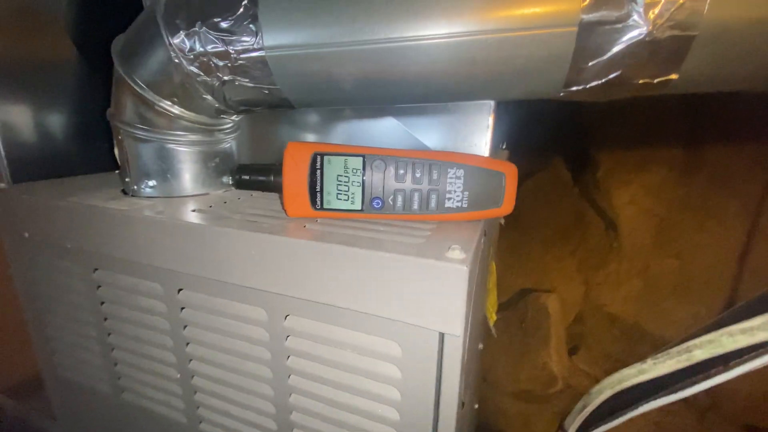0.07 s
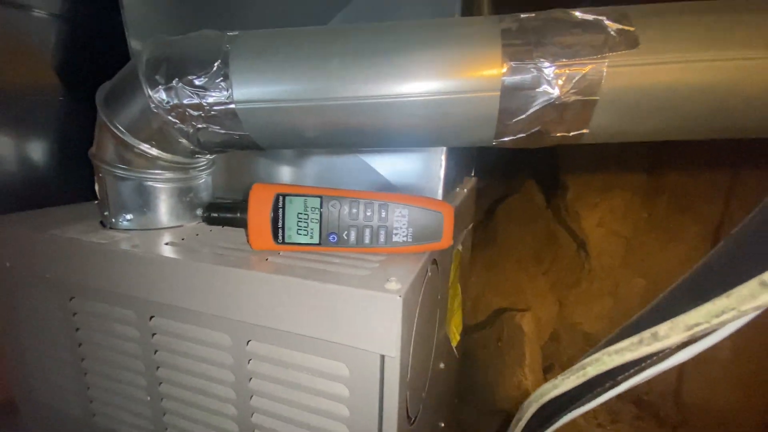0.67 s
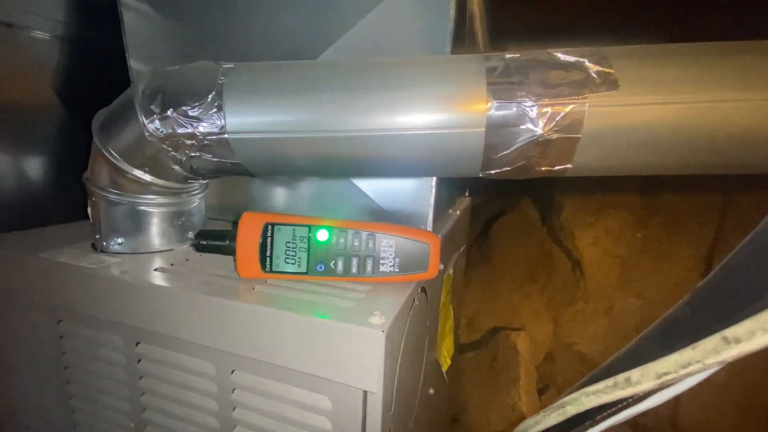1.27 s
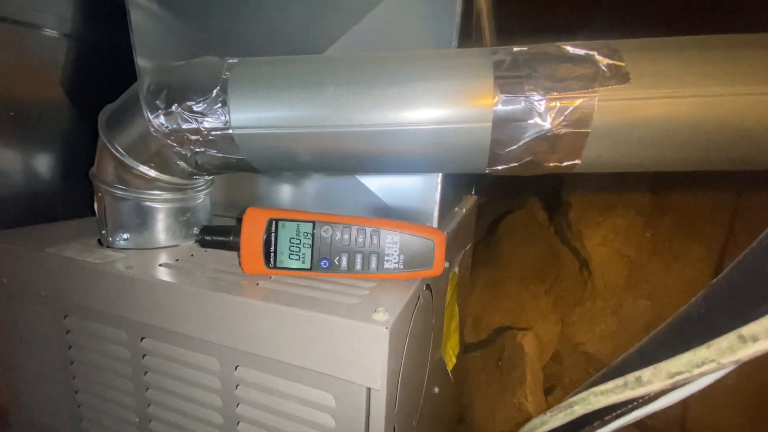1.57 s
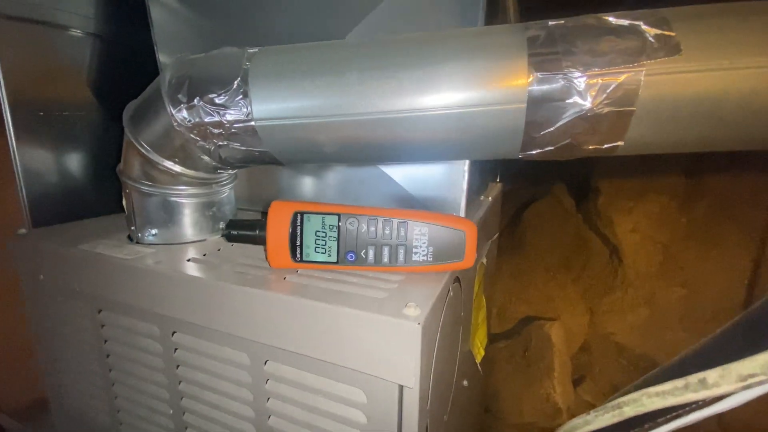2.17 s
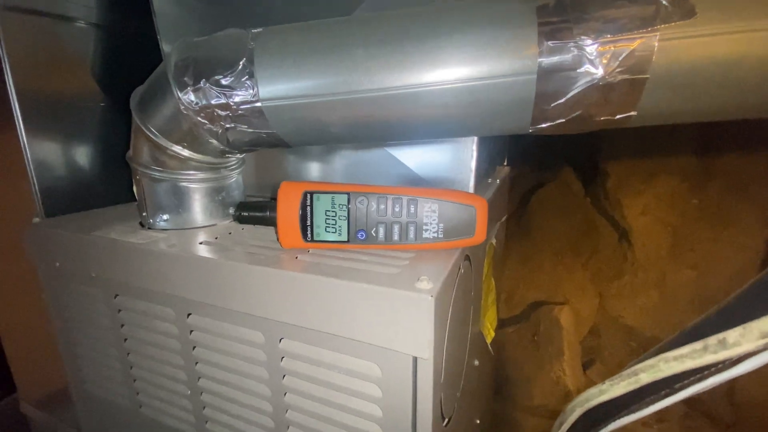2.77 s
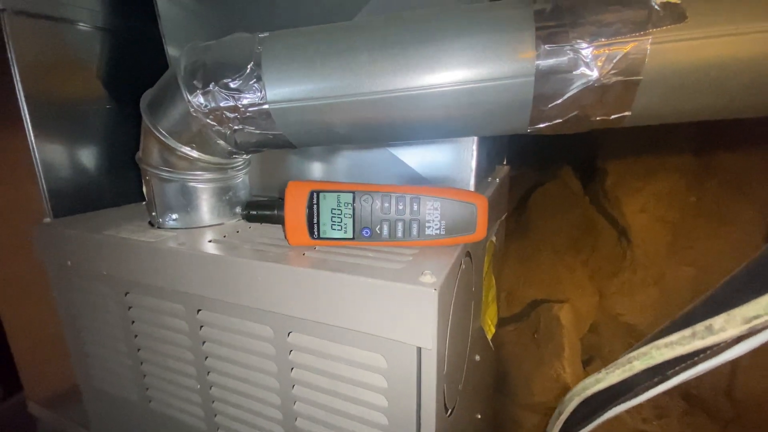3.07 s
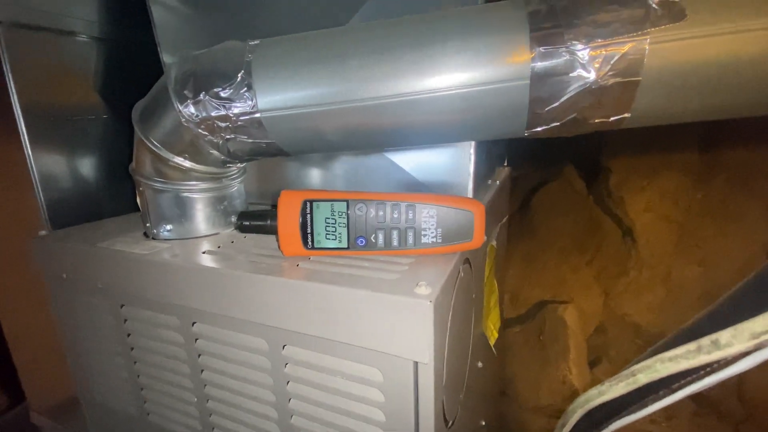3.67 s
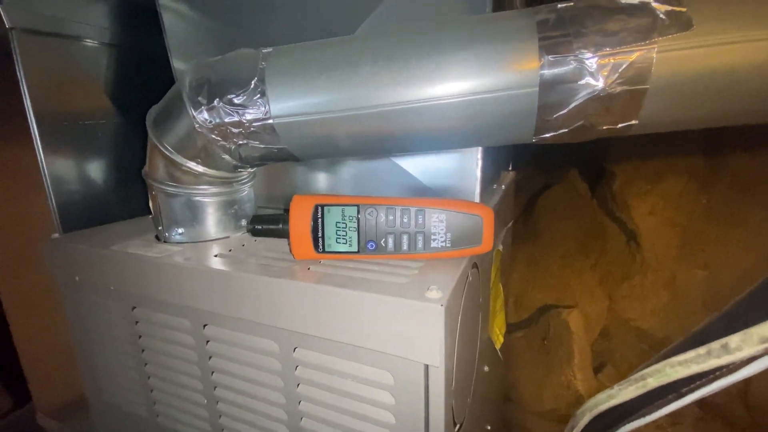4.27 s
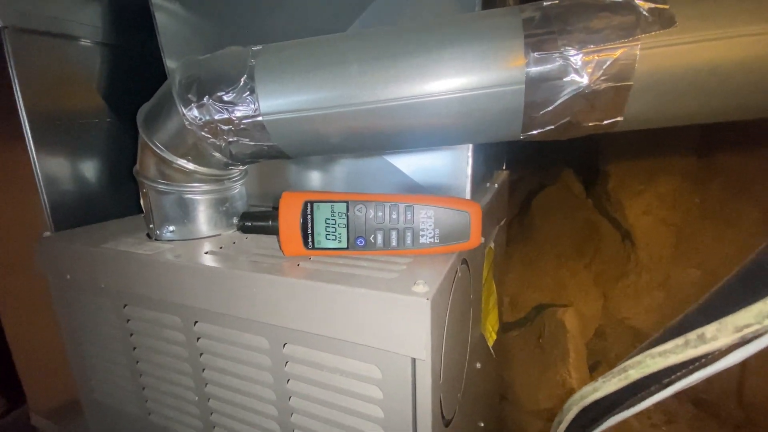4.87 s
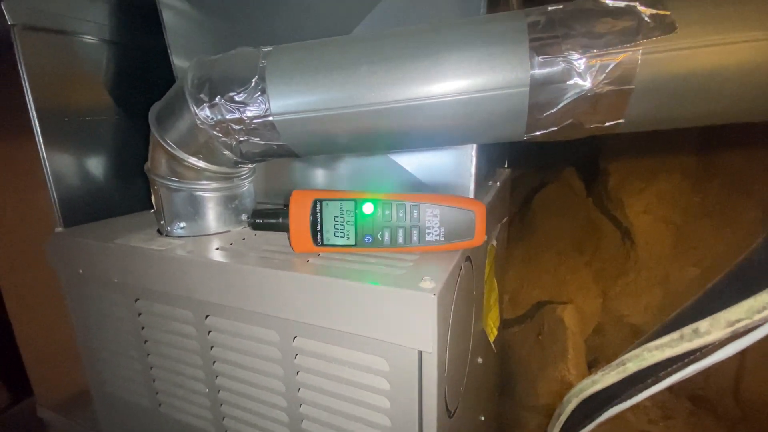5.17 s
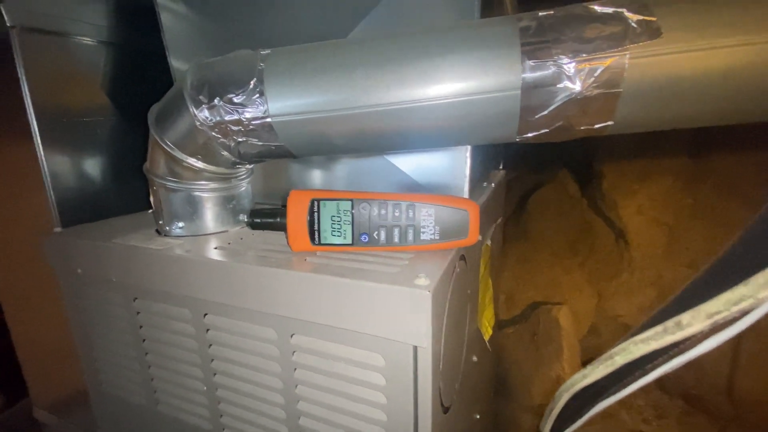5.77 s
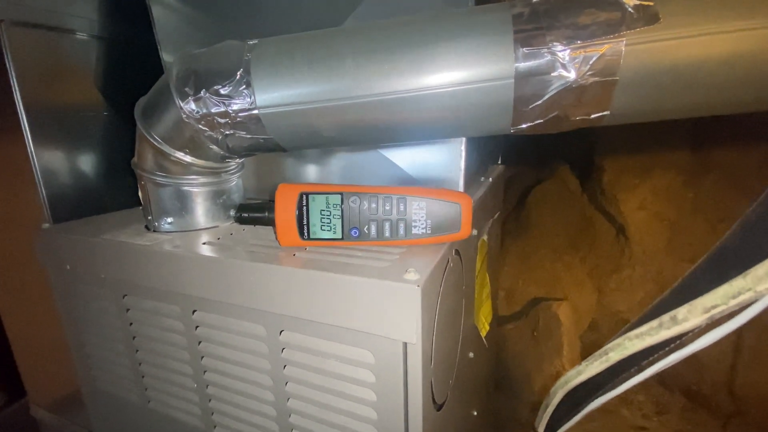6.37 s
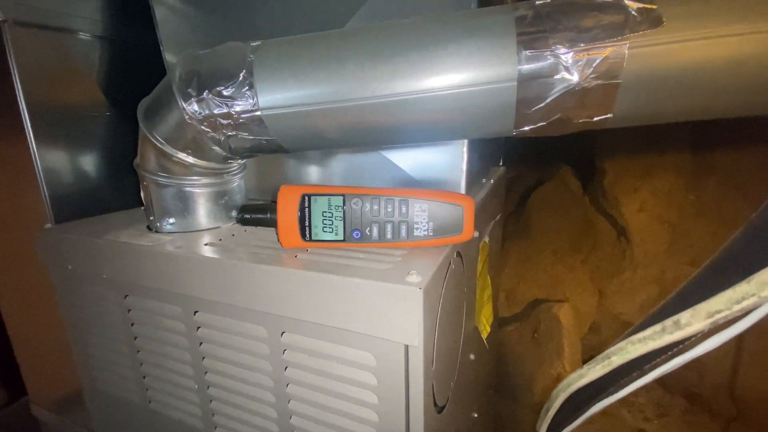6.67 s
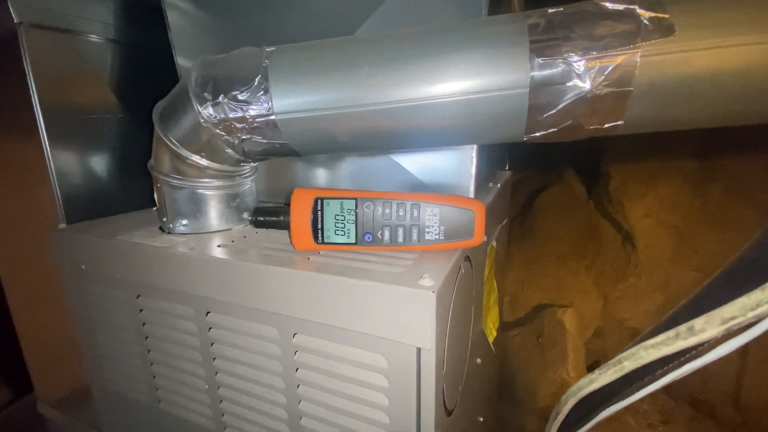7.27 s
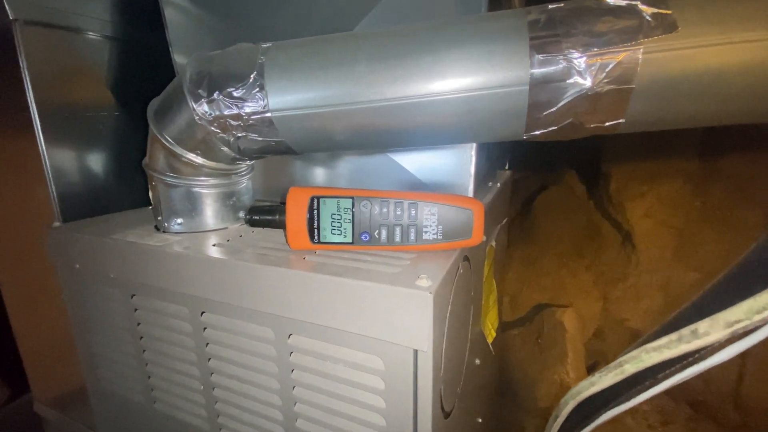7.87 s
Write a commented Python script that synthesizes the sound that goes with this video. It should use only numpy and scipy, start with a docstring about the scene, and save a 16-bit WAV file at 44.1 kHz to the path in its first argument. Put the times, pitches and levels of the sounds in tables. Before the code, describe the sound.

Close to the microphone and slightly left, furnace burners rumble deeply in a basement, with air rushing through sheet metal and a few faint whistles. After a couple of seconds the airflow grows and a low, pulsing hum of two tones joins the rumble, staying to the end. Small dry ticks are scattered all the way through, and a soft high rustle is heard once.

```python
"""A basement, with a gas furnace running close by and a little to the left.
The burners rumble in the flue and air rushes through the sheet-metal cabinet and ducts. Around 2.6 s
the rush swells and two resonances of the furnace set in as a throbbing two-note hum.
Dry ticks crackle all the way through, faint whistles come and go, and there is one brief high rustle."""
import sys
import numpy as np
from scipy import signal
from scipy.fft import rfft, irfft
from scipy.io import wavfile
from scipy.ndimage import uniform_filter1d

SR = 44100
rng = np.random.default_rng(int(sys.argv[2]) if len(sys.argv) > 2 else 0)


def master_out(mix):
    """Clip the mix to full scale and print it as 16-bit PCM to the path in sys.argv[1]."""
    frames = np.transpose(np.atleast_2d(mix))
    ceiling = np.clip(frames, -1, 1)
    pcm = np.round(ceiling * 32767).astype(np.int16)
    wavfile.write(sys.argv[1], SR, pcm)


N = 353373
TIME = np.arange(N) / SR
FREQS = np.maximum(np.arange(N // 2 + 1) * SR / N, 1)
SWELL_S, SWELL_LENGTH_S = 2.59, 0.21   # the air flow grows as the hum sets in


def from_db(db):
    """Decibels to gain."""
    return 10 ** (np.asarray(db) / 20)


def power_db(power):
    """Power to decibels."""
    return 10 * np.log10(power)


def unit_rms(x):
    """Scale to an rms of 1."""
    return x / np.sqrt(np.mean(x ** 2) + 1e-20)


def ramp(start_s, length_s):
    """A straight fade from 0 to 1."""
    return np.clip((TIME - start_s) / length_s, 0, 1)


def over_time(rows):
    """An envelope's breakpoints joined up at every sample."""
    return np.interp(TIME, *np.transpose(rows))


def over_frequency(rows):
    """Each column of a spectrum at every frequency, joined on a log axis."""
    hz, *columns = np.transpose(rows)
    return [np.interp(np.log(FREQS), np.log(hz), column) for column in columns]


def bell(hz, width_hz):
    """Power response of a resonance applied twice, 1 at its peak."""
    return 1 / (1 + (2 * (FREQS - hz) / width_hz) ** 2) ** 2


def drift(rate_hz):
    """A smooth random wander with an rms of about 1."""
    hop, run_in = 40, 2000
    pole = np.exp(-2 * np.pi * rate_hz * hop / SR)
    noise = rng.standard_normal(N // hop + run_in + 2)
    slow = signal.lfilter([1], [1, -2 * pole, pole * pole], noise)[run_in:]
    return np.interp(np.arange(N) / hop, np.arange(len(slow)), unit_rms(slow))


def turbulence(density_db):
    """Stereo noise of the given dB per Hz, with its own left-right likeness, phase and balance per band."""
    # stereo spread of the noise: freq_hz, coherence (0-1), left_lead_rad, left_over_right_db
    stereo_spread = [(25, 0.7, 0.5, 5.5), (50, 0.95, 0.6, 3.7), (75, 0.95, 0.8, 5.0),
                     (110, 0.99, 0.75, 6.7), (150, 0.99, 1.15, 8.8), (190, 0.8, 1.1, 8.5),
                     (255, 0.92, 1.6, 10.3), (300, 0.76, 1.2, 10.0), (355, 0.5, 1.4, 11.0),
                     (405, 0.15, 3.0, 5.2), (440, 0.3, 4.6, 10.5), (490, 0.15, 3.5, 8.0),
                     (560, 0.45, 4.6, 7.2), (650, 0.72, 5.1, 4.6), (710, 0.35, 4.8, 5.5),
                     (780, 0.72, 4.4, 6.0), (890, 0.68, 4.4, 1.0), (980, 0.62, 4.7, 2.7),
                     (1250, 0.7, 5.0, 2.8), (1450, 0.55, 5.3, 4.7), (1650, 0.15, 5.7, 5.5),
                     (1900, 0.68, 5.4, 7.0), (2150, 0.48, 6.1, 1.8), (2550, 0.22, 5.3, 2.2),
                     (3400, 0.15, 4.3, -1.7), (4500, 0.25, 6.0, 0.0), (6100, 0.3, 3.0, -3.2),
                     (7800, 0.4, -0.3, 1.2), (8800, 0.75, 3.1, 0.3), (9700, 0.41, 4.2, 0.3),
                     (11000, 0.93, 6.3, 0.3), (12000, 0.8, 6.3, 0.2), (13300, 0.55, 9.4, 0.2),
                     (15400, 0.8, 12.5, 0.8)]
    coherence, lead_rad, pan_db = over_frequency(stereo_spread)
    shared, own = rfft(rng.standard_normal((2, N)))
    left = shared * from_db(pan_db / 2)
    right = coherence * shared + np.sqrt(1 - coherence ** 2) * own
    right = right * np.exp(-1j * lead_rad) * from_db(-pan_db / 2)
    equal_power = np.sqrt(2 / (from_db(pan_db) + from_db(-pan_db)))
    return irfft(np.array([left, right]) * equal_power * from_db(density_db) * np.sqrt(SR / 2), N)


def resonant_flow(before_db, after_db, bands, start_s, length_s):
    """Turbulence shaped by peaks and dips, crossfading from one colour to another."""
    for hz, width_hz, lift_before_db, lift_after_db in bands:
        shape = bell(hz, width_hz)
        before_db = before_db + power_db(1 + (from_db(2 * lift_before_db) - 1) * shape)
        after_db = after_db + power_db(1 + (from_db(2 * lift_after_db) - 1) * shape)
    blend = ramp(start_s, length_s)
    return np.sqrt(1 - blend) * turbulence(before_db) + np.sqrt(blend) * turbulence(after_db)


def ride_level(noise, level_db, window_s):
    """Even out a noise over window_s, then set it to a level."""
    power = uniform_filter1d(noise.mean(axis=0) ** 2, int(window_s * SR))
    return noise / np.sqrt(power + 1e-20) * from_db(level_db)


def whistles(whine_hz=670, whine_db=-58, beat_s=0.638, crest_s=4.37, wander_hz=2.05, pan_db=5):
    """Thin tones in the rush: a whine beats slowly, a few join the hum, two whistles come and go."""
    # faint steady tones that enter with the hum: pitch_hz, level_db
    held_tones = [(705, -61), (775.5, -61), (1009, -67), (2017, -64)]
    # whistles that swell and fade: middle_s, length_s, pitch_hz, level_db
    passing_tones = [(.4, 1.7, 1191, -53.5), (0.918, 0.63, 888, -50.5)]
    tones = [(whine_hz, from_db(whine_db) * np.cos(np.pi * (TIME - crest_s) / beat_s))]
    tones += [(hz, from_db(db) * ramp(SWELL_S, SWELL_LENGTH_S)) for hz, db in held_tones]
    for middle_s, length_s, hz, db in passing_tones:
        arch = np.cos(np.pi * np.clip((TIME - middle_s) / length_s, -0.5, 0.5))
        tones.append((hz, from_db(db) * arch))
    wave = np.zeros(N)
    for hz, gain in tones:
        pitch_hz = hz + wander_hz * drift(rate_hz=4)
        wave += gain * np.sin(2 * np.pi * np.cumsum(pitch_hz) / SR)
    return np.sqrt(2) * wave * from_db([[pan_db / 2], [-pan_db / 2]])


def rustle(peak_s=5.112, peak_db=-49.5, grain_db=4.5, crinkle_s=5.138, crinkle_db=-40.5):
    """A faint, brief high rustle in uneven grains, with one small crinkle in its lower band."""
    # treble bands of the rustle: centre_hz, width_hz, relative_db
    rustle_bands = [(4600, 1700, -1), (6600, 1300, 2)]
    bands = [from_db(2 * db) * bell(hz, width_hz) for hz, width_hz, db in rustle_bands]
    since_s = TIME - peak_s
    level_db = peak_db + np.minimum(170 * since_s, -150 * since_s)   # rise and fall in dB per second
    stir = unit_rms(turbulence(power_db(sum(bands)))) * from_db(level_db + grain_db * drift(rate_hz=90))
    snap = from_db(crinkle_db) * np.exp(-((TIME - crinkle_s) / 0.0024) ** 2)
    return stir + unit_rms(turbulence(power_db(bands[0]))) * snap


def small_ticks(beat_hz=83.004, cycle_hz=21.688, cycle_at_s=0.0164, window_s=0.004):
    """Rows of quiet ticks: each fast beat may tick, most likely near a beat of the slower cycle."""
    start_s = np.arange(1, int(N / SR * beat_hz)) / beat_hz
    apart_s = (((start_s - cycle_at_s) * cycle_hz + 0.5) % 1 - 0.5) / cycle_hz
    chance = 0.1 + 0.8 * np.exp(-(apart_s / window_s) ** 2)
    fires = rng.random(len(start_s)) < chance
    size, side = np.clip(rng.standard_normal((2, len(start_s))), -2, 1)
    level_db, pan_db, knock_db = -35 + 1.5 * size, 10 + 6 * side, np.zeros(len(start_s))
    return np.column_stack([start_s, level_db, pan_db, knock_db])[fires]


def ticks(boost_db=6.0, edge_hz=15000, knock_hz=600, decay_s=0.0015):
    """Dry clicks, mostly on the left: each a sudden step in the waveform, up or down, that dies fast."""
    # the loudest ticks: start_s, level_db (before the boost), left_over_right_db, knock_lift_db
    loud_ticks = [(0.4363, -24, 16, 2.5), (0.5176, -27.0, 16, -3), (0.5301, -26, 10, 0),
                  (0.6139, -26.5, 16, 2), (0.6621, -23, 15, 0.5), (0.795, -29.5, 16, -8),
                  (1.0359, -28, 11, 2), (1.1207, -32, 16, 2), (1.217, -28.5, 18, 5), (1.349, -28, -3, -3),
                  (1.3541, -30.0, 16, 5), (1.7597, -18.5, 12, 0), (1.867, -31, 12, 2),
                  (1.9029, -20.5, 16, 0.5), (2.0484, -19.5, 6, -3), (2.2286, -29.5, 10, 1),
                  (2.3199, -30, 14, 3), (2.3249, -29.5, 1, 1), (2.5542, -24.5, 13, 2),
                  (2.7342, -24.5, 16, 2.5), (2.9752, -24.5, 12, 1), (3.1082, -25.5, 12, 3.5),
                  (3.2413, -31, 16, 6), (3.4213, -20.5, 3, -2), (3.4338, -22, 5, -4), (3.5658, -28, 16, -1),
                  (3.6987, -25, 16, -1), (3.795, -28, 16, 1), (3.8034, -28, 7, 1), (3.8432, -21.5, 18, 1),
                  (3.9752, -26.5, 0, -2), (4.0725, -22, 14, -2), (4.2527, -29, 9, 6), (4.349, -24, 16, 1),
                  (4.3972, -28, 16, 4), (4.5301, -29.0, 13, 5), (4.5417, -27.5, 7, 0),
                  (4.7709, -25, 16, -1), (4.8066, -24, 2, 4), (4.812, -25, 14, 0), (5.0841, -23.5, 5, 0),
                  (5.1805, -26.5, 5, -8), (5.2188, -26, 16, 0), (5.4936, -25, 9, 2), (5.5061, -29, -7, -3),
                  (5.7824, -27, 16, -2), (6.0118, -27, 13, 2), (6.06, -21.5, 6, -1), (6.2893, -24.5, 8, -5),
                  (6.3374, -29, 14, 4), (6.4695, -22, 16, 0), (6.5658, -28, 16, -1), (6.8789, -25, 7, 1),
                  (6.891, -23, 0, -1), (6.9752, -26, 5, 0), (7.121, -24, 16, 0), (7.1688, -27, 9, 1),
                  (7.3009, -27, 16, 1), (7.349, -28, 12, -2), (7.4334, -25, -4, 3), (7.8548, -28, 15.5, 3)]
    start_s, level_db, pan_db, knock_db = np.vstack([small_ticks(), loud_ticks]).T
    sides = from_db([pan_db / 2, -pan_db / 2])
    at = np.clip(np.round(start_s * SR).astype(int), 0, N - 1)
    polarity = rng.choice([-1, 1], len(at))
    clicks, knocks = np.zeros((2, 2, N))
    clicks[:, at] = sides / sides.mean(axis=0) * from_db(level_db + boost_db) * polarity
    knocks[:, at] = clicks[:, at] * (from_db(knock_db) - 1)   # more or less of a dull knock
    knock_band = signal.butter(1, [knock_hz / 2, knock_hz * 2], "band", fs=SR)
    clicks = clicks + signal.lfilter(*knock_band, knocks + 1e-18)
    soften = np.exp(-2 * np.pi * edge_hz / SR)   # slightly rounds the attack
    clicks = signal.lfilter([1 - soften], [1, -soften], clicks + 1e-18)
    leak = np.exp(-1 / (decay_s * SR))   # each click becomes a step that dies away
    return signal.lfilter([1], [1, -leak], clicks)


def air_rush(after_trim_db=-0.74, surge_db=0.5, settle_s=1, flutter_db=0.9):
    """Air flutters through the ringing ducts and surges as the hum starts; its hiss swells twice."""
    # colour of the rush around the swell: freq_hz, before_db_per_hz, after_db_per_hz (untrimmed)
    rush_spectrum = [(316, -67, -61), (419, -69, -63.5), (530, -74, -67), (780, -73.5, -69),
                     (1000, -75, -71.5), (1380, -74.5, -72), (1630, -79, -76.5), (2170, -77, -75.5),
                     (3190, -84, -81), (4980, -89, -85.5), (6500, -90, -87), (9200, -99, -96.5),
                     (15300, -106.9, -102.4)]
    # peaks and dips in the colour of the rush: centre_hz, width_hz, lift_before_db, lift_after_db
    rush_bands = [(254, 109, 13, 10), (308.6, 80, -12, -4), (382, 47, 0, -2), (441, 22, 5, 5.5),
                  (560, 17, 9.5, 4.5), (645, 44, 9, -1.5), (668, 35, 2.5, 5), (886, 60, 8, 6.5),
                  (1180, 40, 2, 3), (1310, 31, 6, 6), (1370, 40, 2.5, 3), (1903, 110, 6.5, 6),
                  (2027, 67, -3, 4), (2640, 77, 4.5, 4.5), (3150, 51, 4, 4), (7030, 3140, 4, 3.5),
                  (10680, 2500, 6.5, 7.5)]
    # envelope of a broad band of hiss: time_s, level_db_per_hz
    hiss_envelope = [(0, -100), (0.25, -87), (0.55, -78.5), (1.1, -79.5), (1.5, -83.5), (2.62, -85),
                     (2.75, -76), (3.05, -77), (3.3, -84), (3.9, -88), (8, -92)]
    settling_s = np.maximum(TIME - SWELL_S - SWELL_LENGTH_S, 0)
    overshoot_db = surge_db * ramp(SWELL_S, SWELL_LENGTH_S) * np.exp(-settling_s / settle_s)
    gain = from_db(overshoot_db + flutter_db * drift(rate_hz=20))
    hiss = turbulence(power_db(bell(hz=2200, width_hz=890))) * from_db(over_time(hiss_envelope))
    before_db, after_db = over_frequency(rush_spectrum)
    rush = resonant_flow(before_db, after_db + after_trim_db, rush_bands, SWELL_S, SWELL_LENGTH_S)
    return rush * gain + hiss


def hum_note(hz, sag_hz_per_s, overtones, start_s, attack_s, level_db, db_per_s, waver_db,
             sway_rad, pan_db, left_lead_rad, throb_hz=7.2, throb_db=0.1):
    """One slowly sagging note; the throb sways its phase and, very slightly, its wavering level."""
    since_s = TIME - start_s
    pitch_hz = hz - sag_hz_per_s * since_s
    throb = np.sin(2 * np.pi * throb_hz * TIME + 0.1 * drift(rate_hz=0.75))
    phase = 2 * np.pi * np.cumsum(pitch_hz) / SR + sway_rad * (throb + 0.13 * drift(rate_hz=21))
    phase = phase - np.array([[0], [left_lead_rad]])
    wave = np.sin(phase) + sum(from_db(db) * np.sin(round(k) * phase) for k, db in overtones)
    right = from_db(-pan_db)
    centre = abs(1 + right * np.exp(-1j * left_lead_rad)) / 2   # panning keeps the mono level
    sides = np.array([[1], [right]]) / centre
    attack = np.clip(since_s / attack_s, 1e-4, 1)
    envelope_db = level_db + db_per_s * since_s + throb_db * throb + waver_db * drift(rate_hz=9.9)
    return np.sqrt(2) * wave * sides * attack * from_db(envelope_db)


def hum():
    """Two resonances of the furnace sing about a minor third apart, the upper one less steadily."""
    # overtones of each note: harmonic_number, relative_db
    low_overtones = [(2, -30)]
    high_overtones = [(3, -32)]
    low = hum_note(hz=220, sag_hz_per_s=0.14, overtones=low_overtones,
                   start_s=2.705, attack_s=0.05, level_db=-24.5, db_per_s=-1.02, waver_db=0.63,
                   sway_rad=0.036, pan_db=13.6, left_lead_rad=1.09)
    high = hum_note(hz=259.5, sag_hz_per_s=0.53, overtones=high_overtones,
                    start_s=2.42, attack_s=0.3, level_db=-31.5, db_per_s=0.43, waver_db=0.65,
                    sway_rad=0.7, pan_db=10.5, left_lead_rad=1.7)
    return low + high


def burners(roar_trim_db=0.1, draught_db=-32, crossover_hz=85, rolloff_hz=172):
    """The flames roar unevenly in the flue, which passes only bass, over a deep, steady draught."""
    # strength of the flames' roar: time_s, level_db (untrimmed)
    flame_envelope = [(0.0, -21.5), (0.38, -25), (0.64, -19), (0.84, -29.5), (0.89, -25), (1.45, -24),
                      (1.54, -29.5), (1.56, -19.5), (1.69, -29), (1.74, -18), (1.78, -32), (1.83, -22.5),
                      (2.25, -21), (2.34, -32), (2.36, -20.5), (2.67, -23.5), (2.72, -18), (2.74, -21),
                      (2.99, -26), (3.03, -19), (3.12, -25), (4.21, -22.5), (4.3, -31), (4.34, -22.5),
                      (4.63, -27), (4.79, -16.5), (4.86, -33), (4.88, -25), (5.35, -24), (5.39, -29),
                      (5.55, -22.5), (6.21, -27), (6.26, -16.5), (6.42, -29.5), (6.71, -22), (6.79, -24.5),
                      (6.84, -36), (6.88, -27.5), (7.0, -21), (7.04, -33), (7.08, -24.5), (7.17, -27),
                      (7.2, -21.5), (7.31, -27), (7.35, -18.5), (7.53, -27.5), (7.69, -22), (7.73, -35),
                      (7.78, -16), (7.84, -27), (7.98, -24), (8.0, -24.5)]
    # colour of the rumble in the flue: freq_hz, relative_db
    flue_spectrum = [(12, -55), (20, -40.5), (119, 3), (147, 1.5), (180, -7.5), (230, -27), (400, -120)]
    # air columns of flue and heat exchanger: centre_hz, width_hz, lift_before_db, lift_after_db
    flue_modes = [(57.7, 9, 4.5, 6.5), (105, 17, 2, 2.5), (138.1, 8, 6.5, -1), (151, 8.2, 0, 3.5)]
    colour_db = over_frequency(flue_spectrum)[0] - power_db(1 + (FREQS / rolloff_hz) ** 20)
    upper_db = colour_db - power_db(1 + (crossover_hz / FREQS) ** 10)
    lower_db = colour_db - power_db(1 + (FREQS / crossover_hz) ** 20)
    # the resonances change balance once the hum is under way
    roar, draught = [resonant_flow(db, db, flue_modes, start_s=3.03, length_s=0.65)
                     for db in (upper_db, lower_db)]
    roar = ride_level(roar, over_time(flame_envelope) + roar_trim_db, window_s=0.13)
    return roar + ride_level(draught, draught_db, window_s=0.26)


def scene():
    """Rumble, rush, hum and small noises together."""
    return burners() + air_rush() + hum() + ticks() + rustle() + whistles()


def record(dry):
    """A steep low-pass takes off the very top."""
    return signal.sosfiltfilt(signal.ellip(10, 0.05, 60, 15750, fs=SR, output="sos"), dry)


dry = scene()
out = record(dry)
master_out(out)
```